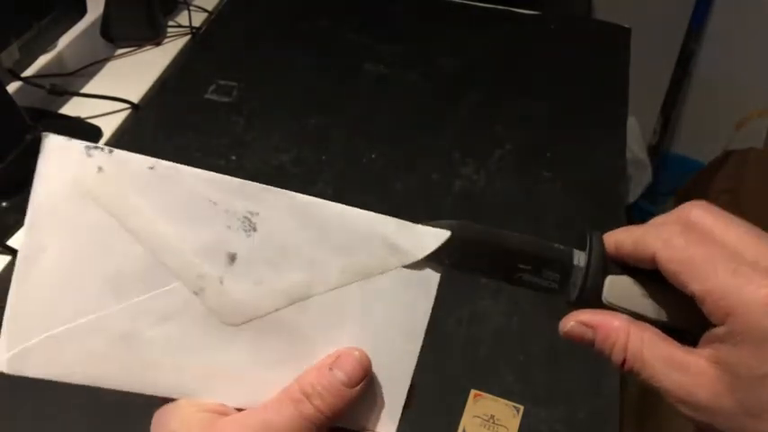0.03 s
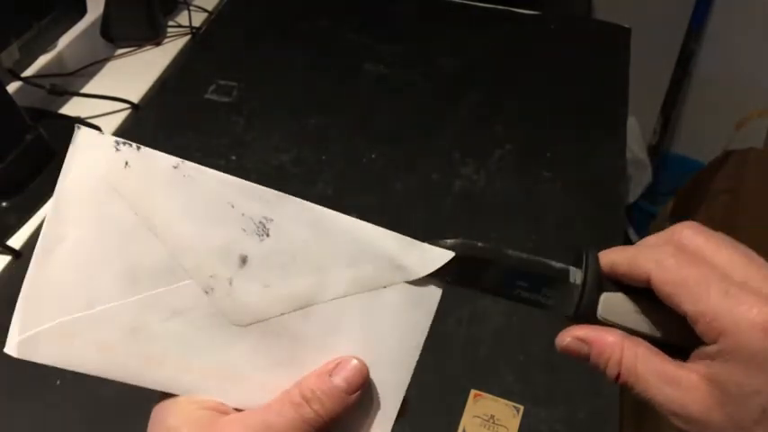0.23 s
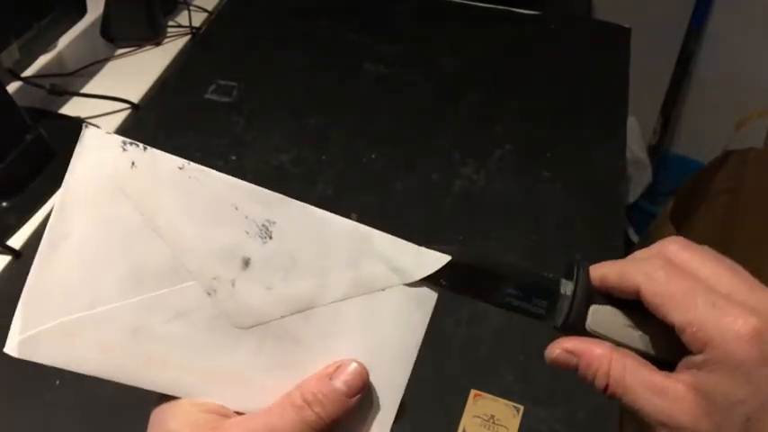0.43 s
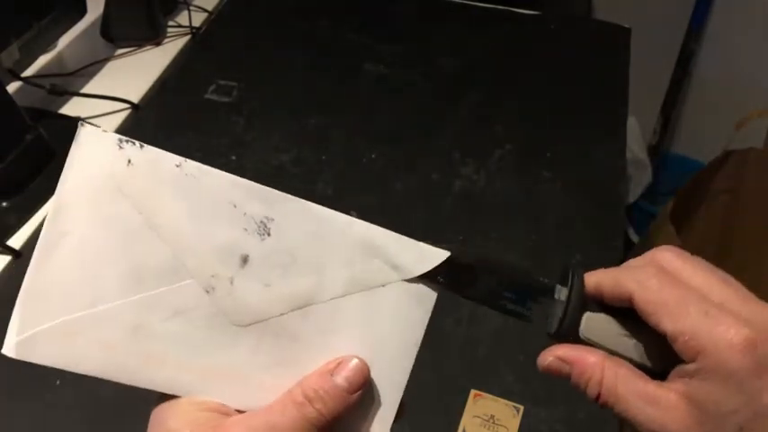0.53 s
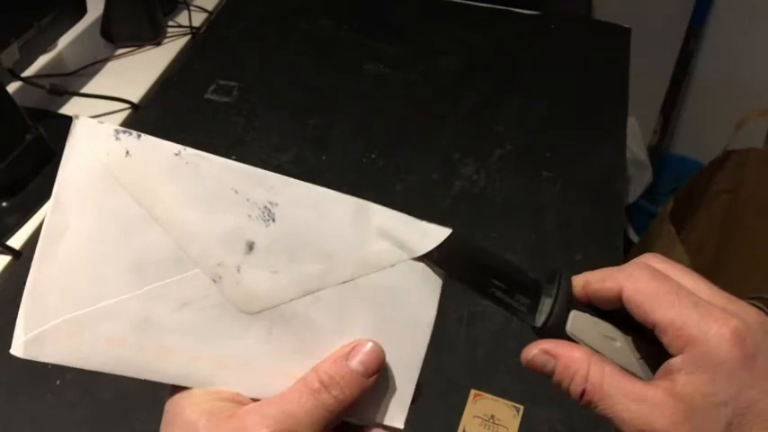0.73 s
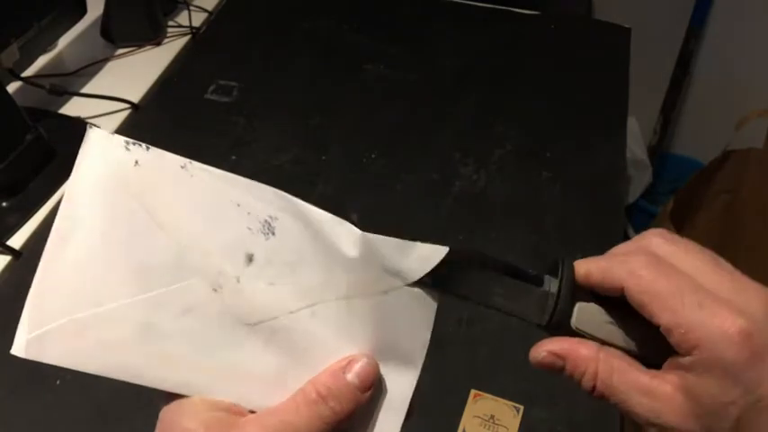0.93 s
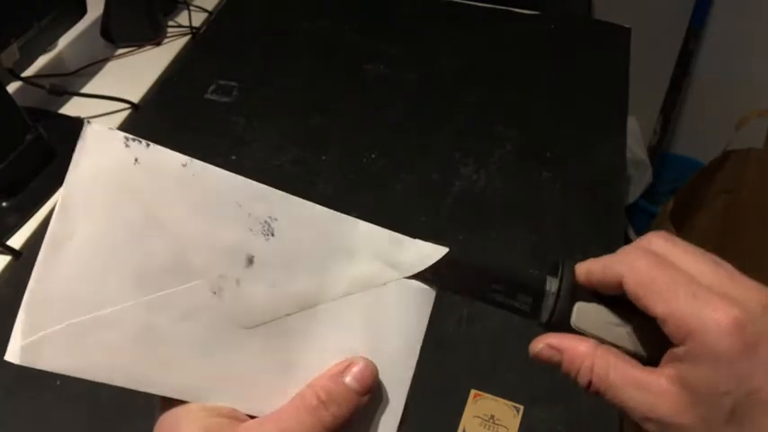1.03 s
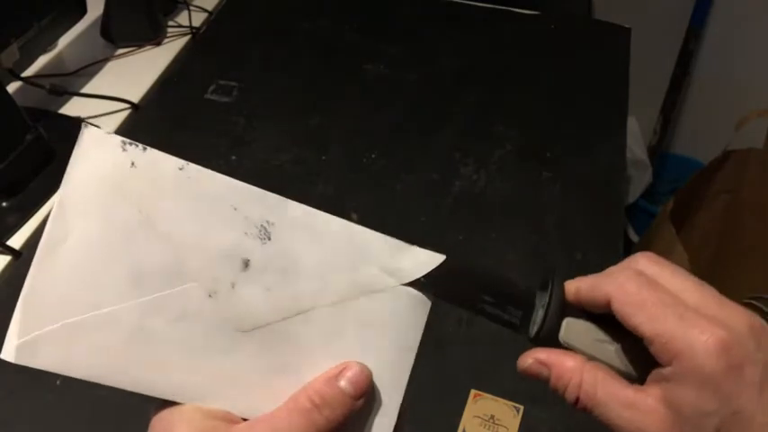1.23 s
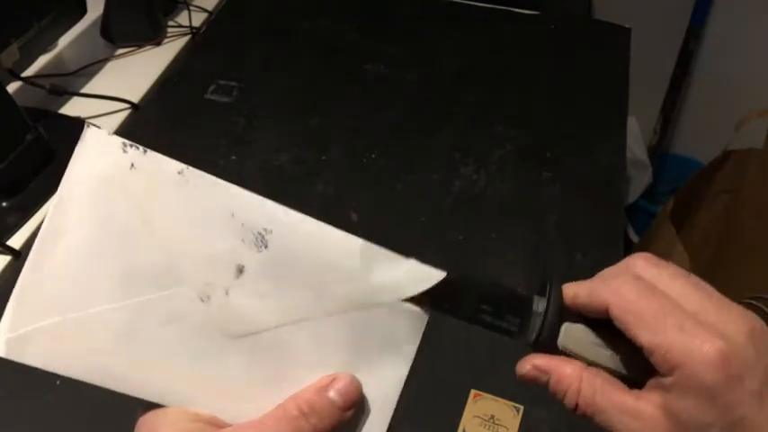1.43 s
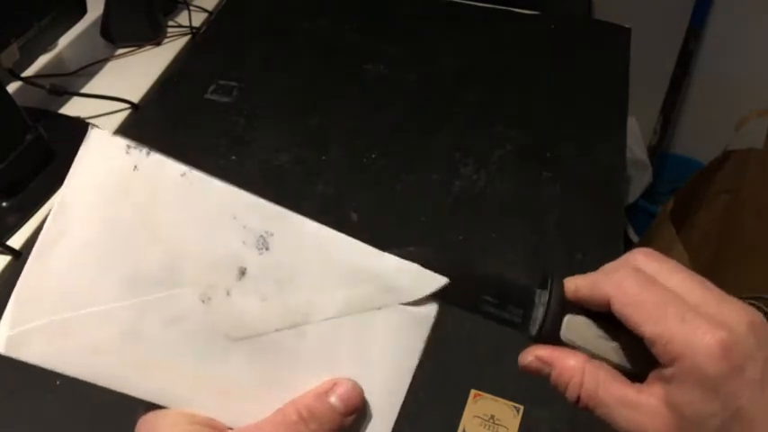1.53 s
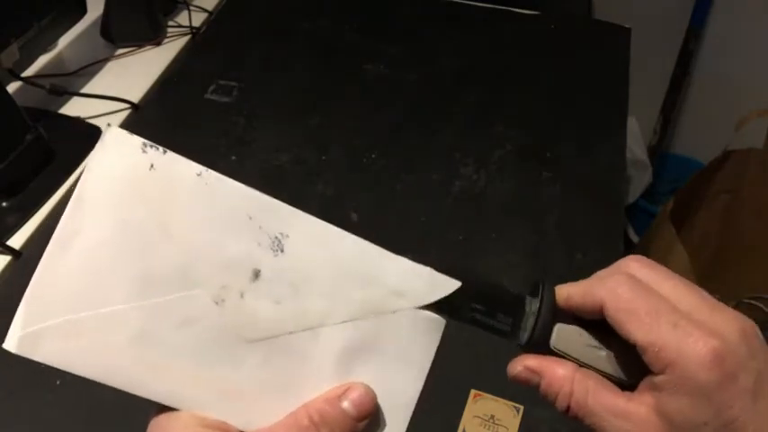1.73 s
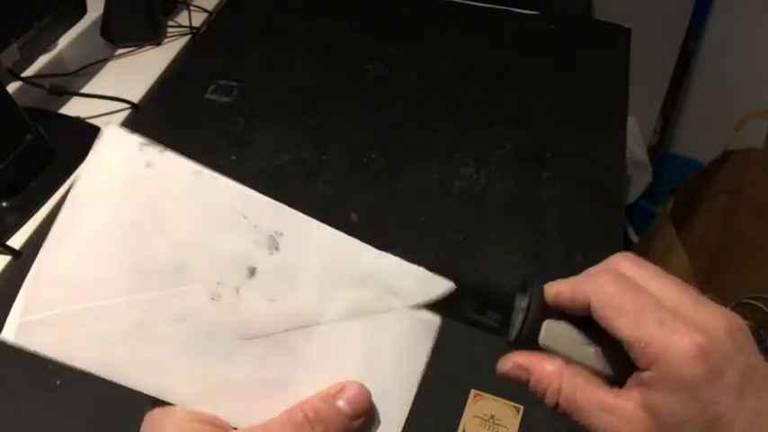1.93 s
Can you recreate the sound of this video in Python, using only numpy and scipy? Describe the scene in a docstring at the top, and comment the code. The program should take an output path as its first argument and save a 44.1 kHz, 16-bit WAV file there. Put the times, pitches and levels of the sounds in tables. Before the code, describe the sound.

A paper envelope is slit by a small knife, very close to the microphone in a small room: faint scratchy strokes, damped paper pops and clicks, then a short loud rip and a few last crackles.

```python
"""A small knife slits a paper envelope, close to the microphone, over a desk in a small room.
The blade slides in short strokes, heard as clumps of tiny slips; the sheet buckles in soft, damped pops.
Single fibres snap as clicks; at 1.6 s the fold gives way in one loud rip, a dense burst of breaks.
The held envelope bumps dully as the fold gives and just after the rip. Behind lie a short
reverberation, room air (coloured noise) and a low wavering hum."""
import sys
import numpy as np
from scipy import signal
from scipy.fft import rfft, irfft
from scipy.io import wavfile
from scipy.ndimage import map_coordinates

SR = 44100
rng = np.random.default_rng(int(sys.argv[2]) if len(sys.argv) > 2 else 0)


def dump(signal):
    """Clip the signal to [-1, 1] and save it as 16-bit WAV at the path in sys.argv[1]."""
    limited = np.clip(np.atleast_2d(signal).T, -1, 1)
    pcm = np.round(limited * 32767).astype(np.int16)
    wavfile.write(sys.argv[1], SR, pcm)


N = 88200  # 2 s

# Colour of the room air: [f/Hz, level/dB]
AIR_COLOUR = [(18, -39), (30, -9), (81, -6), (277, -0.5), (505, -11), (1330, -19), (2990, -28.5),
              (9680, -31), (15500, -38.5)]
# Reverberation time of the small room: [f/Hz, T60/s]
ROOM_T60 = [(300, 0.33), (1500, 0.24), (12000, 0.48)]
# Colour of the room's answer: [f/Hz, level/dB]
ROOM_COLOUR = [(330, 3), (700, -1.5), (1800, 0.5), (15000, -8)]
# Dull bumps of the envelope in the hand, one as the fold gives and one just after the rip:
# [t/s, level/dB]
HAND_BUMPS = [(1.572, -44), (1.711, -47.5)]
# The sheet buckling, levels before POP_COLOUR: [t/s, snap level/dB, snap f/Hz, low flap level/dB]
BUCKLES = [(0.0908, -33, 1050, -43), (.521, -32.5, 1500, -59), (0.5295, -35.5, 1400, -45),
           (.547, -46, 1640, -55), (0.564, -47, 960, -56), (0.7301, -41, 1580, -34),
           (0.804, -38.5, 990, -46.5), (0.8998, -28, 1350, -40), (.9447, -33, 3000, -60),
           (0.9454, -33, 1280, -34.5), (1.1517, -27, 1230, -36), (1.1546, -27, 1120, -58),
           (1.1635, -16.5, 4180, -63), (1.1637, -18, 1820, -32.5), (1.1672, -23.5, 1950, -34),
           (1.303, -31.5, 1730, -51), (1.3081, -23.5, 2130, -29), (1.3669, -37, 960, -39),
           (1.384, -38, 700, -34.5), (1.3939, -34.5, 1130, -34.5), (1.4503, -35, 1750, -37.5),
           (1.496, -32.5, 1100, -44.5), (1.5025, -23, 1970, -32.5), (1.5622, -30.5, 1020, -32),
           (1.7534, -33.5, 1260, -41.5), (1.7814, -17, 5300, -60), (1.7838, -26, 1300, -53),
           (1.7854, -25, 2400, -48.5), (1.8564, -24.5, 1520, -40.5), (1.915, -37.5, 1244, -49)]
# The folded sheet radiates little treble: [f/Hz, level/dB]
POP_COLOUR = [(2400, -0.5), (4300, -15.5), (14000, -44)]
# Single fibres snapping at the edge: [t/s, peak level/dB, depth from 0 thin surface fibre to 1 through
# the fold (held at 1 above that)]
FIBRE_SNAPS = [(0.057, -51, .9), (0.09, -35.5, 0.39), (0.1046, -40.5, 0.24), (0.2293, -33, 0.18),
               (0.2403, -36, 0.08), (0.2594, -35.5, 0.061), (0.4074, -37.5, 0.098), (0.4197, -37.5, 0.079),
               (0.8992, -20.5, 1.2), (0.9446, -31, 0.6), (1.1362, -33, 0.26), (1.1615, -27, 0.65),
               (1.3792, -33, 0.15), (1.4009, -26, 0.21), (1.407, -22.5, 0.4), (1.407, -18.5, 0.35),
               (1.4226, -27, 0.17), (1.5481, -28.5, .05), (1.575, -31, 1), (1.5858, -19, 0.95),
               (1.5866, -15.5, 0.5), (1.593, -18, 0.47), (1.5979, -9.5, 0.74), (1.6097, -16.5, .9),
               (1.6188, -14.5, .9), (1.625, -19.5, 0.77), (1.6282, -16.5, 0.9), (1.788, -31, 0.95),
               (1.7945, -32, 0.8), (1.8368, -34.5, 0.65), (1.855, -35, 0.79), (1.966, -43, 0.28)]
# Colours of a thin surface fibre and of a deep one: [f/Hz, level/dB]
THIN_COLOUR = [(2000, -32), (7000, -10), (9500, 0), (12000, -6), (16000, -18)]
DEEP_COLOUR = [(100, -24), (1800, -1), (2700, -6), (4400, 2), (6500, -3), (7600, -11), (9500, -3),
               (12000, -19), (16000, -30)]
# The fold tearing: [t/s, crackle level/dB, shaken sheet level/dB]
FOLD_RIP = [(1.563, -57, -53.5), (1.593, -40.5, -41), (1.593, -29.5, -33), (1.608, -25.5, -28),
            (1.619, -23.5, -30), (1.63, -24, -25.5), (1.642, -34, -34), (1.661, -60, -69)]
# Colours of the breaking fibres and of the shaken sheet: [f/Hz, level/dB]
CRACKLE_COLOUR = [(800, -30), (2300, -11), (3500, -11), (4600, -2), (6500, 1), (7600, -10), (9400, -4),
                  (11000, -14), (13400, -12), (16000, -20)]
SHEET_COLOUR = [(60, -33), (150, -11), (240, 1), (420, -0.5), (560, -5), (1700, -0.5), (2800, -8),
                (8000, -45)]
# Blade sliding on paper: [t/s of fastest motion, rise/s, fall/s, hiss level/dB, rasp level/dB,
# sheet rustle level/dB]
BLADE_STROKES = [(0.087, 0.025, 0.018, -64.5, -68.5, -50.5), (0.215, 0.011, 0.019, -58.5, -61, -56.5),
                 (0.402, 0.018, 0.036, -59.5, -66.5, -61.5), (0.521, .007, 0.012, -61.5, -56.5, -52.5),
                 (.453, 0.012, 0.013, -69, -68.5, -59.5), (0.613, 0.018, 0.037, -60, -67.5, -60),
                 (0.721, 0.0075, 0.011, -56, -49, -49.5), (0.851, 0.02, 0.064, -53, -52, -50),
                 (1.144, 0.11, 0.061, -57.5, -58, -56), (1.271, 0.009, 0.041, -60, -63, -52),
                 (1.402, 0.019, 0.019, -44, -43.5, -46), (1.518, 0.025, 0.035, -55.5, -52, -49),
                 (1.7, 0.046, 0.042, -44, -44, -45.5), (1.783, 0.0042, .009, -66, -47.5, -37),
                 (1.82, 0.0084, 0.0064, -58.5, -50.5, -46.5), (1.968, 0.0039, 0.036, -63.5, -65, -60)]
# Colours of the blade's hiss, its rasp and the sheet's rustle: [f/Hz, level/dB]
HISS_COLOUR = [(3000, -35), (7500, -11), (9400, 0), (13000, -8), (16000, -15)]
RASP_COLOUR = [(1500, -22), (2800, -6), (4700, 0), (6500, 1), (7800, -7), (10000, -12), (16000, -35)]
RUSTLE_COLOUR = [(90, -25), (200, -2), (340, 1), (480, -10), (750, -7), (1400, 0), (2300, -5), (3200, -16),
                 (9000, -45)]

AIR_DB, HUM_HZ, HUM_DB = -57, 90.4, -63.3  # room air level, mean hum pitch, hum level
ROOM_DB = -9
BUMP_HZ, BUMP_RISE_S = 99.6, 0.0087
POP_CYCLES, POP_GRIT = 0.64, 0.35  # rise of a buckling snap in cycles; gain of the noise in it
FLAP_HZ, FLAP_RISE_S = 302.4, 0.0024  # middle pitch and rise of the low flap
SNAP_DECAY_S, SNAP_SPLINTER = 0.0008, 0.27  # splintering noise: decay and gain beside a click of 1
BUNDLE_DB, FACET_DB = -6, -3  # bundles relative to the crackle, facets relative to the rustle
BEND_DELAY_S = 0.000501  # travel time of a 1 kHz bending wave across the paper
TOP_HZ = 15900  # band limit of the recorder


def amp(db):
    """Decibels to gain."""
    return 10 ** (np.asarray(db) / 20)


def unit(x):
    """Scale to rms 1."""
    return x / np.sqrt(np.mean(x ** 2) + 1e-20)


def along(points, hz):
    """Read (f/Hz, value) points on a log frequency axis."""
    f, v = np.transpose(points)
    return np.interp(np.log(hz + 1), np.log(f + 1), v)


def coloured(x, points):
    """Causal minimum-phase filter with the given (f/Hz, level/dB) colour."""
    m = 2 * N
    gain = amp(along(points, np.fft.rfftfreq(m, 1 / SR)))
    # Folding the cepstrum onto positive time makes the filter causal
    cepstrum = irfft(np.log(gain), m)
    cepstrum[1:N] *= 2
    cepstrum[N + 1:] = 0
    response = np.exp(rfft(cepstrum))
    return irfft(rfft(x, m) * response, m)[:len(x)]


def wobble(rate):
    """A smooth random curve, rate knots a second."""
    knots = rng.standard_normal(int(N * rate / SR) + 4)
    return map_coordinates(knots, [np.arange(N) * rate / SR])


def swell(u):
    """A smooth rise to 1 at u = 1, then a fade."""
    return (u * np.exp(1 - u)) ** 2


def add(track, s, sound):
    """Mix a short sound in at time s."""
    part = track[max(round(s * SR), 0):][:len(sound)]
    part += sound[:len(part)]


def slips(per_s, spread_db):
    """Tiny impulses of uneven size and either sign at random times, rms 1."""
    chance = rng.random(N)
    size = np.clip(rng.standard_normal(N), -2, 2)
    sign = np.sign(rng.standard_normal(N))
    return unit((chance < per_s / SR) * amp(spread_db * size) * sign)


def flicks(count, hz, octaves, cycles, range_db):
    """Bits of paper flick at random times, each ringing briefly at its own pitch; rms 1."""
    when, pitch, size = rng.random((count, 3)).T[..., None]
    n = np.arange(SR // 100)
    turns = hz * 2 ** (octaves * (pitch - 0.5)) * n / SR
    rings = amp(-range_db * size) * np.cos(2 * np.pi * turns) * np.exp(-turns / cycles)
    places = (when * N).astype(int) + n
    return unit(np.bincount(places.ravel(), rings.ravel(), N)[:N])


def bending(x):
    """Bending waves in paper: the treble arrives first, the bass later."""
    hz = np.fft.rfftfreq(2 * N, 1 / SR)
    # This phase delays each frequency by BEND_DELAY_S * sqrt(1000 / hz)
    turns = 2 * BEND_DELAY_S * np.sqrt(hz * 1000)
    return irfft(rfft(x, 2 * N) * np.exp(-2j * np.pi * turns))[:N]


def background():
    """Room air as coloured noise, and a low hum wavering in pitch and level."""
    phase = 2 * np.pi * np.cumsum(HUM_HZ + 3.4 * wobble(14)) / SR
    hum = unit(np.sin(phase) * amp(2.3 * wobble(10.73)))
    air = unit(coloured(rng.standard_normal(N), AIR_COLOUR))
    return amp(AIR_DB) * air + amp(HUM_DB) * hum


def room(x):
    """The small room's answer: a tail of decaying noise, each band fading at its own T60."""
    hz, t, bands = signal.stft(rng.standard_normal(SR // 2), SR, nperseg=256)
    decay = amp(-60 * t / along(ROOM_T60, hz)[:, None])
    tail = signal.istft(bands * decay, SR, nperseg=256)[1]
    tail = np.pad(tail / np.linalg.norm(tail), (SR // 300, 0))  # starts 3.3 ms after the direct sound
    return coloured(signal.fftconvolve(x, tail)[:N], ROOM_COLOUR)


def bumping():
    """The held envelope jolts and pushes a few slow cycles of air."""
    out, t = np.zeros(N), np.arange(SR // 10) / SR
    for s, db in HAND_BUMPS:
        add(out, s, amp(db) * swell(t / BUMP_RISE_S) * np.sin(2 * np.pi * BUMP_HZ * t))
    return out


def buckling():
    """The sheet flips with a snap of two or three cycles, then the envelope flaps, mostly much lower."""
    out, t = np.zeros(N), np.arange(SR // 30) / SR
    grit = unit(coloured(rng.standard_normal(N), RUSTLE_COLOUR))
    for s, snap_db, hz, flap_db in BUCKLES:
        rise = POP_CYCLES / hz
        snap = swell(t / rise) * np.cos(2 * np.pi * hz * (t - rise))
        noise = np.roll(grit, -round(s * SR))[:len(t)]
        crease = POP_GRIT * swell(t / rise / 2) * noise
        add(out, s - rise, amp(snap_db) * (snap + crease))
        flap_hz = FLAP_HZ * np.exp(0.16 * rng.standard_normal())
        flap = swell(t / FLAP_RISE_S) * np.sin(2 * np.pi * flap_hz * t)
        add(out, s, amp(flap_db) * flap)
    return coloured(out, POP_COLOUR)


def snapping():
    """A fibre breaks with one click and a brief splintering; deeper breaks sound lower."""
    out, t = np.zeros(N), np.arange(SR // 100) / SR
    thin = unit(coloured(t == 0, THIN_COLOUR))
    deep = unit(coloured(t == 0, DEEP_COLOUR))
    for s, db, depth in FIBRE_SNAPS:
        click = SNAP_SPLINTER * rng.standard_normal(len(t)) * np.exp(-t / SNAP_DECAY_S)
        click[0] = 1
        depth = np.clip(depth, 0, 1)
        snap = np.convolve(click, (1 - depth) * thin + depth * deep)
        add(out, s, amp(db) * snap / np.abs(snap).max())
    return out


def ripping():
    """Fibres break by the thousand along the fold, bundles crack among them, the whole sheet shakes."""
    s, crackle_db, sheet_db = np.transpose(FOLD_RIP)

    def level(db):
        """Gain drawn through the rip's points, silent outside them."""
        return amp(np.interp(np.arange(N) / SR, s, db, left=-np.inf, right=-np.inf))

    breaks = bending(slips(per_s=5400, spread_db=4.5))
    bundles = flicks(count=2400, hz=4640, octaves=1.55, cycles=1.3, range_db=20)
    crackle = unit(coloured(breaks, CRACKLE_COLOUR)) + amp(BUNDLE_DB) * bundles
    sheet = unit(coloured(breaks, SHEET_COLOUR))
    return level(crackle_db) * crackle + level(sheet_db) * sheet


def sliding():
    """The moving blade catches on the paper's grain in uneven clumps and flicks small facets of it."""
    t = np.arange(N) / SR
    power = np.zeros((3, N))  # of hiss, rasp and rustle
    for s, rise, fall, *levels_db in BLADE_STROKES:
        speed = np.exp(-((t - s) / np.where(t < s, rise, fall)) ** 2)
        power += (amp(levels_db)[:, None] * speed) ** 2
    catch = amp(3.17 * wobble(170))  # the clumps, shared by all three layers
    hiss = unit(coloured(slips(per_s=2600, spread_db=7) * catch, HISS_COLOUR))
    rasp = unit(coloured(slips(per_s=7000, spread_db=4.0) * catch, RASP_COLOUR))
    rustle = unit(coloured(slips(per_s=4000, spread_db=-1.5) * catch, RUSTLE_COLOUR))
    facets = flicks(count=900, hz=1460, octaves=0.73, cycles=1.3, range_db=13)
    rustle = unit(rustle + amp(FACET_DB) * facets)
    return bending((np.sqrt(power) * [hiss, rasp, rustle]).sum(0))


def scene():
    """Knife and paper, their room and its background."""
    paper = sliding() + buckling() + snapping() + ripping() + bumping()
    return (paper + amp(ROOM_DB) * room(paper) + background())[None]


def record(dry):
    """The recorder keeps nothing above its band limit."""
    kept = np.fft.rfftfreq(2 * N, 1 / SR) < TOP_HZ
    return irfft(rfft(dry, 2 * N) * kept)[:, :N]


dry = scene()
out = record(dry)
dump(out)
```